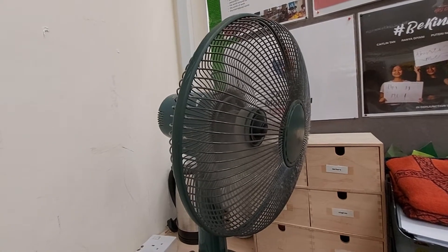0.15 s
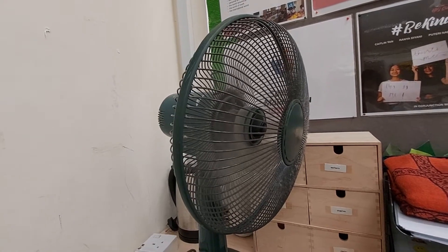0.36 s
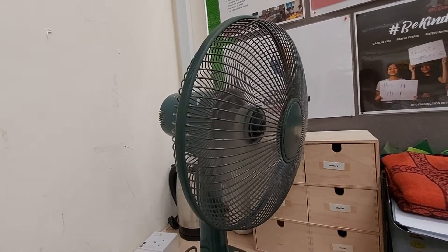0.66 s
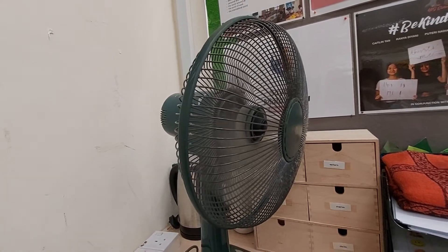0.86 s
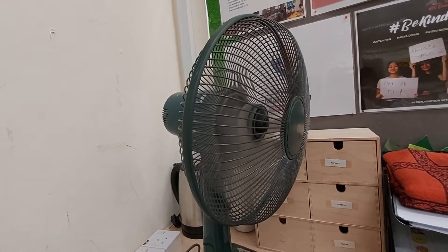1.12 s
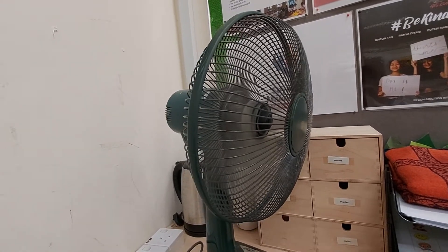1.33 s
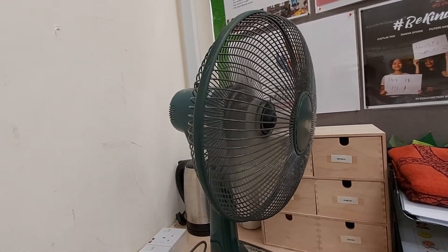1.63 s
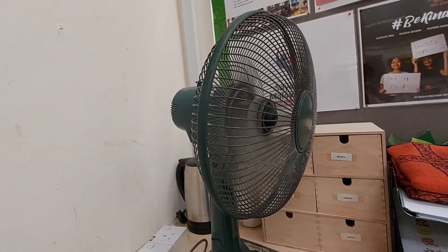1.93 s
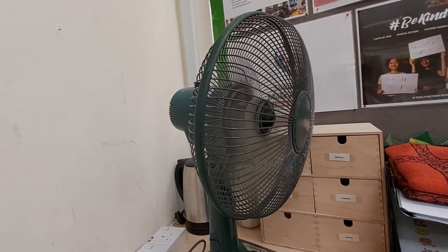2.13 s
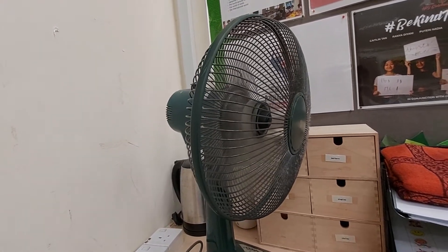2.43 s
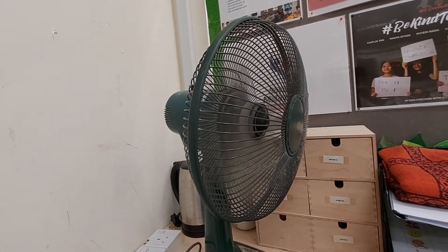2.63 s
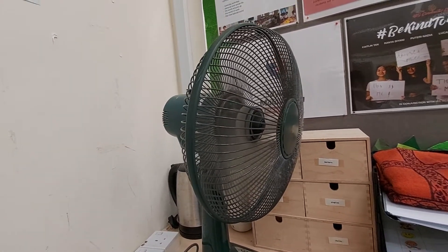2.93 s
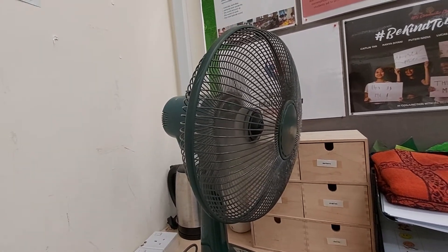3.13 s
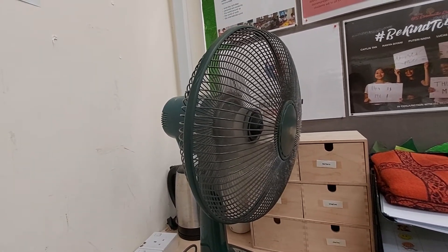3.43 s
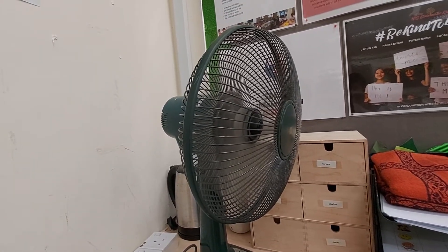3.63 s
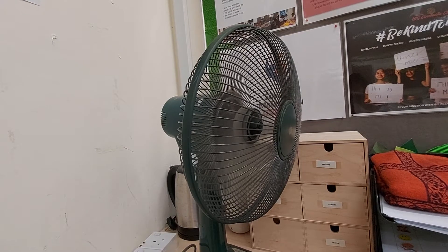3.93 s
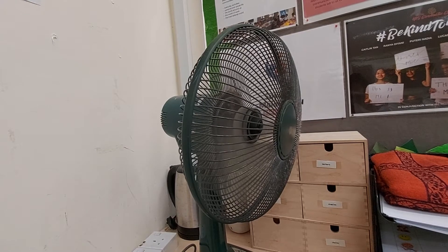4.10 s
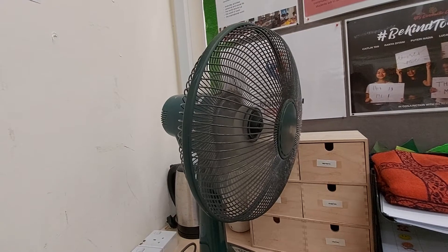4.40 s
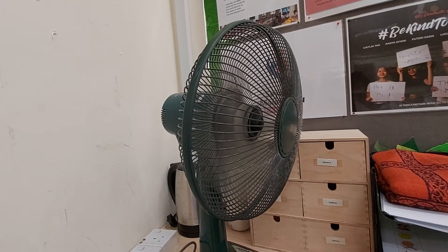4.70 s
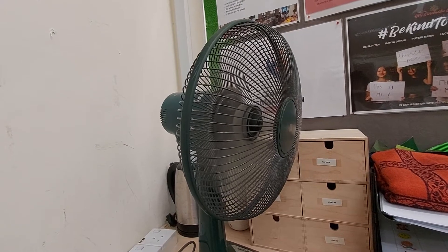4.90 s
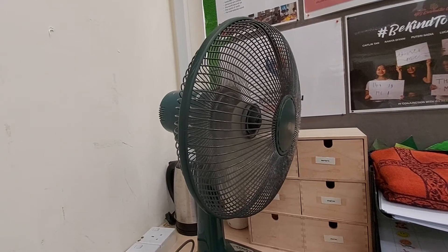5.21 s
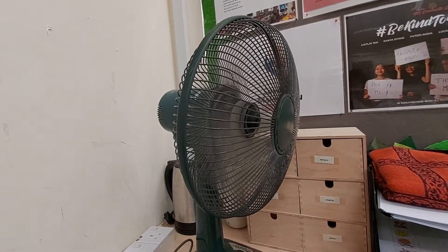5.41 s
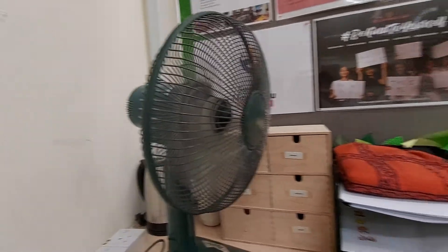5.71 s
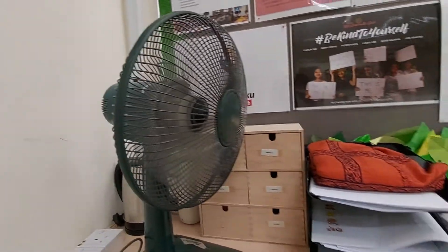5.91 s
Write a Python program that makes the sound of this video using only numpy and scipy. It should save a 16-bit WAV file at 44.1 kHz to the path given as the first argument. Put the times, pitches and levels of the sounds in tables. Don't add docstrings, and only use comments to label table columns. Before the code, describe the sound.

A table fan runs steadily at high speed close by, an even rush of air over a low, wavering motor and blade hum.

```python
import sys
import numpy as np
from scipy import signal
from scipy.io import wavfile
from scipy.ndimage import uniform_filter1d

SR = 44100
rng = np.random.default_rng(int(sys.argv[2]) if len(sys.argv) > 2 else 0)


def to_wav(sig):
    pcm = np.clip(np.atleast_2d(sig), -1, 1) * 32767
    pcm = np.round(pcm).astype(np.int16)
    wavfile.write(sys.argv[1], SR, pcm.T)


def gain_from_decibels(decibels):
    exponent = np.asarray(decibels, float) / 20
    return 10 ** exponent


N = 266849

# time in seconds, gain in dB.
RECORDER_GAIN = [
    (0, -3.5),
    (.25, -4),
    (.74, -2),
    (.9, 0.04),
    (1.4, 0.17),
    (3, -0.4),
    (5.4, 0.1),
    (6.05, -0.8),
]
# time in seconds, blade passes per second.
BLADE_RATE = [(0, 60.4), (.7, 60.8), (1, 61.0), (6.05, 60.95)]

# frequency in Hz, level in dB per Hz.
RUMBLE_SPECTRUM = [(20, -26), (40, -9.5), (53, -7.5), (68, -6.5), (95, -6.5), (112, -1), (138, -2.5),
                   (166, -14), (190, -6.5), (228, 1), (256, -6), (275, -7), (335, -17), (520, -32)]
# frequency in Hz, level in dB per Hz.
RUSH_SPECTRUM = [(180, -36), (300, -4.5), (344, -7.5), (408, -4.5), (451, -9), (493, -9), (530, -11.5),
                 (689, -5.5), (971, -11.5), (1210, -8), (1300, -10.5), (1410, -13.5), (1690, -13.5),
                 (1950, -11.5), (2600, -22), (3380, -41.5), (5720, -120)]
# frequency in Hz, level in dB per Hz.
HISS_SPECTRUM = [(1350, -33), (2300, -4), (2990, -6.5), (3350, -7), (3600, -9), (3900, -8), (5600, -13.5),
                 (7400, -17.5), (7650, -20.5), (11450, -21), (11700, -25.5), (13000, -25), (13300, -27),
                 (15800, -32)]
# frequency in Hz, left-right likeness from 0 to 1.
PORT_LIKENESS = [(60, 0.94), (340, 0.88), (520, 0.72), (780, 0.89), (1020, 0.32), (1240, 0.75), (1550, .12),
                 (2000, 0.55), (2280, 0.35), (2600, 0.3), (3000, 0.4), (3500, .1), (4900, .2),
                 (6500, 0.029)]
# frequency in Hz, left over right in dB.
PORT_LEAN = [(60, 2), (92, -1), (140, -5), (210, 0), (330, -3), (500, 0.5), (770, -1.5), (1170, -3),
             (1790, -8.5), (2740, -0.5), (4190, 0), (6410, -3), (9810, -1.0), (15000, -1.5)]
# frequency in Hz, left lead in radians.
PORT_LEAD = [(60, 0.7), (300, -0.07), (500, 0.43), (800, 0.46), (1200, 0.05), (1500, -0.25), (1650, 0.35),
             (1900, 0.5), (2150, -0.2), (2380, 0.5), (3000, 2), (3300, 6.3), (4300, 9.0), (5900, 13)]
# centre in Hz, width in Hz, height in dB.
ROOM_COLOUR = [(252, 8.7, -5.5), (76.4, 9.6, 0.5), (266, 17, 3.5), (298, 11, 0), (322, 11, 3),
               (330, 9.1, 2), (315, 12, 2), (334, 6.2, -3), (359, 9.8, -3), (388, 5.6, -4.5),
               (415, 7.2, -2.5), (442, 12, 0), (456, 15, -2), (505, 11, 2.5), (635, 20, 0), (1340, 74, 1),
               (1423, 80, -4.5), (1483, 69, 4.5), (1690, 71, 4.5), (2290, 72, -1)]

# frequency in Hz, width in Hz, waver depth as a ratio.
LOW_MODE = (89.5, 11.1, 0.7)
# frequency in Hz, width in Hz, waver depth as a ratio.
HIGH_MODE = (220, 9, 0.6)
# peak time in seconds, peak level in dB, length in seconds.
LOW_MODE_GUSTS = [(.27, -40.5, 0.22), (.59, -38.5, 0.15), (.78, -33, 0.08), (.93, -39, 0.11),
                  (1.12, -41, 0.16), (1.26, -41, 0.18), (1.35, -40, 0.13), (1.5, -37, 0.11),
                  (1.62, -44, 0.16), (1.79, -39, 0.13), (2.03, -42.5, .1), (2.2, -38.5, 0.27),
                  (2.43, -34, 0.093), (2.54, -43, 0.16), (2.81, -38.5, 0.26), (3.1, -47, .3),
                  (3.24, -43, .09), (3.37, -42, 0.061), (3.77, -35, 0.097), (3.95, -41, 0.17),
                  (4.15, -43, 0.18), (4.33, -47, 0.1), (4.49, -37, 0.072), (4.57, -41.5, 0.083),
                  (4.84, -40.5, 0.17), (5.0, -38.5, 0.091), (5.12, -46, .18), (5.54, -39, 0.13),
                  (5.7, -42, 0.11), (5.97, -39, .12)]
# peak time in seconds, peak level in dB, length in seconds.
HIGH_MODE_PUFFS = [
    (.57, -46.5, 0.2),
    (1.15, -52, .2),
    (1.75, -52.5, 0.22),
    (2.15, -52, .15),
    (2.45, -51, 0.18),
    (3.42, -49, .15),
    (4.9, -50, .2),
    (5.12, -55, .15),
    (5.65, -52, .2),
]

# frequency in Hz, level in dB, left over right in dB,
# left lead in radians, waver rate in Hz, waver depth as a ratio.
MOTOR_TONES = [(98.7, -48, 6, 0.57, 3, 0.35), (201.3, -64.5, 9, 0.22, 2, 0.64),
               (364, -64, -4, .1, 4.0, 0.57), (405.3, -68.5, 7, .1, 3, 0.52),
               (382.4, -69.5, 2, 1.1, 6.2, 0.88), (428, -70, 4, .1, 4.0, 0.49),
               (487, -69, 5, 0.23, 1.7, 0.31), (608.6, -68.5, -4, .1, 4.3, 1),
               (707.4, -67.5, -3, 0.11, 4.7, 0.82), (909, -70, 6, 0.12, 1.6, 0.31),
               (1947, -71.5, -11, .4, 8.0, 0.72)]
BLADE_LEVELS = [-45.5, -46, -56, -57]
# left over right in dB, left lead in radians,
# waver rate in Hz, waver depth as a ratio.
BLADE_PLACES = [(3.5, 0.29, 6.5, 0.28), (-1, -0.036, 3.8, 0.15), (4.5, 0.22, 5.2, 0.55),
                (-2, -0.23, 5.8, 0.41)]
# peak time in seconds, peak level in dB, length in seconds.
ORDER_1_EDDIES = [
    (0.252, -54, 0.12),
    (1.452, -51, .3),
    (2.1, -55, .3),
    (4.48, -54, .15),
    (5.4, -55, .2),
    (5.78, -46, 0.21),
]
# peak time in seconds, peak level in dB, length in seconds.
ORDER_2_EDDIES = [(.5, -47, 0.66), (1.374, -48, 0.31), (2.064, -45, 0.26), (2.693, -49.5, 0.44),
                  (3.3, -52, .2), (3.545, -52, .15), (4.0, -42.5, 0.19), (4.27, -46, 0.23),
                  (4.644, -51, 0.33), (5.33, -46, .2), (5.581, -48.5, .3), (5.986, -40.5, 0.37)]
# peak time in seconds, peak level in dB, length in seconds.
ORDER_3_EDDIES = [(.4, -46, 0.22), (0.898, -54, .2), (1.5, -53, 0.47), (2.014, -53.5, 0.55),
                  (2.86, -53, .4), (3.526, -44, .2), (4.15, -55, 0.33), (4.626, -54, 0.25),
                  (4.98, -53, 0.27), (5.334, -63, 0.093), (5.6, -51, .2), (5.913, -48, 0.26)]
# peak time in seconds, peak level in dB, length in seconds.
ORDER_4_EDDIES = [(.6, -47.5, 0.6), (1.118, -49.5, 0.29), (1.35, -52.5, 0.24), (1.786, -49.5, 0.26),
                  (2.38, -51, 0.34), (2.607, -49, 0.33), (3.103, -50.5, .25), (3.393, -49, 0.085),
                  (3.65, -52, .1), (3.988, -46.5, 0.41), (4.273, -45.5, 0.26), (4.664, -49.5, 0.32),
                  (5.204, -47, 0.1), (5.723, -44, 0.28)]


def evened(x):
    return x / np.sqrt(np.mean(abs(x) ** 2) + 1e-20)


def read(points, hz):
    f, value = np.transpose(points)
    return np.interp(np.log(hz + 1), np.log(f + 1), value)


def curve(rows):
    s, value = np.transpose(rows)
    return np.interp(np.arange(N) / SR, s, value)


def drift(width_hz):
    pole = np.exp(-2 * np.pi * width_hz / SR)
    noise = rng.standard_normal(N) + 1j * rng.standard_normal(N)
    return evened(signal.lfilter([1], np.convolve([1, -pole], [1, -pole]), noise))


def swells(rows):
    t = np.arange(0, N + 64, 64) / SR
    bells = sum(gain_from_decibels(db) * np.exp(-(2 * (t - s) / length) ** 2) for s, db, length in rows)
    return np.interp(np.arange(N) / SR, t, bells)


def room_db(hz):
    return sum(db / (1 + (2 * (hz - centre) / width) ** 2) for centre, width, db in ROOM_COLOUR)


def air(spectrum, size, patchy_db):
    hop = size // 4
    frames, hz = N // hop + 5, np.fft.rfftfreq(size, 1 / SR)
    a, b, c, d, patches = rng.standard_normal((frames, len(hz), 5)).T
    patches = uniform_filter1d(patches, size=12, axis=0)
    patches = evened(uniform_filter1d(patches, size=8, axis=1))

    same = np.clip(read(PORT_LIKENESS, hz), -1, 1)[:, None]
    left = a + 1j * b
    right = same * left + np.sqrt(1 - same ** 2) * (c + 1j * d)
    right = right * np.exp(-1j * read(PORT_LEAD, hz))[:, None]
    lean = gain_from_decibels(read(PORT_LEAN, hz) / 2)[:, None]

    colour_db = (read(spectrum, hz) + room_db(hz))[:, None]
    ports = np.array([left * lean, right / lean]) * gain_from_decibels(colour_db + patchy_db * patches)
    x = signal.istft(ports, nperseg=size, noverlap=size - hop)[1][:, :N]
    return x / np.sqrt(np.mean(x.mean(0) ** 2))


def tone(turns, lean_db, lead, waver_hz, depth):
    common = np.exp(2j * np.pi * (turns + rng.random())) * (1 + depth * drift(waver_hz))
    apart = 0.15 * depth * drift(waver_hz)
    left = gain_from_decibels(lean_db / 2) * np.exp(1j * lead) * (1 + apart)
    right = gain_from_decibels(-lean_db / 2) * (1 - apart)
    return np.sqrt(2 / (1 + depth ** 2)) * (np.array([left, right]) * common).real


def rumble(gain_db):
    spectrum = RUMBLE_SPECTRUM + [(700, -57.5)]
    return gain_from_decibels(-42.5 + 1.04 * gain_db) * air(spectrum, size=8192, patchy_db=-0.37)


def rush(gain_db):
    return gain_from_decibels(-47.5 + gain_db) * air(RUSH_SPECTRUM, size=4096, patchy_db=0.37)


def hiss(gain_db):
    flicker_db = 0.55 * drift(4.3).real
    return gain_from_decibels(-64 + 1.36 * gain_db + flicker_db) * air(HISS_SPECTRUM, size=1024, patchy_db=0.47)


def boom():
    t = np.arange(N) / SR
    calm_db = -58.5
    modes = [(LOW_MODE, gain_from_decibels(calm_db) + swells(LOW_MODE_GUSTS), 0.7),
             (HIGH_MODE, swells(HIGH_MODE_PUFFS), -1.5)]
    return sum(size * tone(hz * t, lean_db, 0.05, width_hz, depth)
               for (hz, width_hz, depth), size, lean_db in modes)


def motor():
    t = np.arange(N) / SR
    return sum(gain_from_decibels(db) * tone(hz * t, *place) for hz, db, *place in MOTOR_TONES)


def blades():
    turns = np.cumsum(curve(BLADE_RATE)) / SR
    eddies = [ORDER_1_EDDIES, ORDER_2_EDDIES, ORDER_3_EDDIES, ORDER_4_EDDIES]
    total = np.zeros((2, N))
    for k in range(4):
        size = gain_from_decibels(BLADE_LEVELS[k]) + swells(eddies[k])
        total += size * tone((k + 1) * turns, *BLADE_PLACES[k])
    return total


def scene():
    gain_db = curve(RECORDER_GAIN)
    noise = rumble(gain_db) + rush(gain_db) + hiss(gain_db)
    return noise + gain_from_decibels(gain_db) * motor() + gain_from_decibels(1.87 * gain_db) * (boom() + blades())


def top_cut(x):
    return signal.sosfilt(signal.butter(12, 15700, fs=SR, output="sos"), x)


def record(dry):
    return top_cut(dry)


dry = scene()
out = record(dry)
to_wav(out)
```